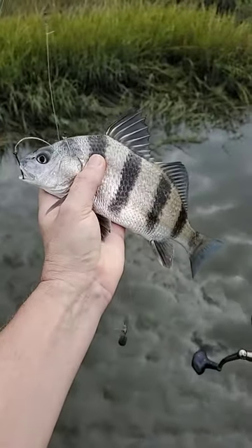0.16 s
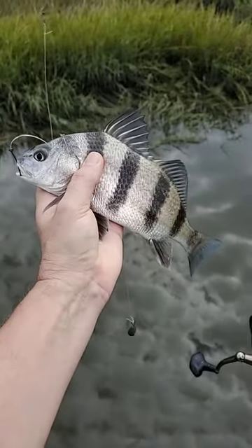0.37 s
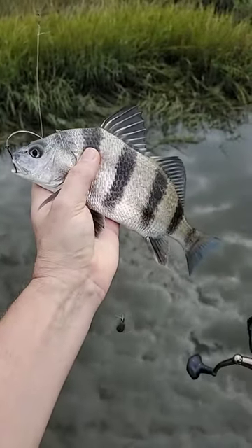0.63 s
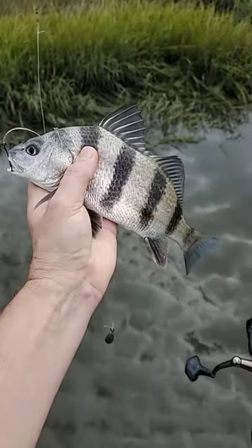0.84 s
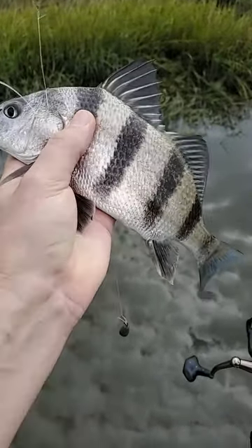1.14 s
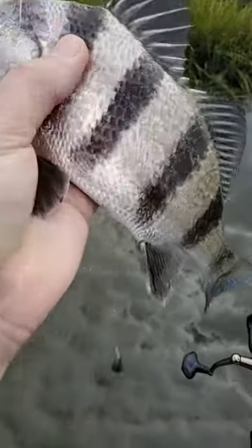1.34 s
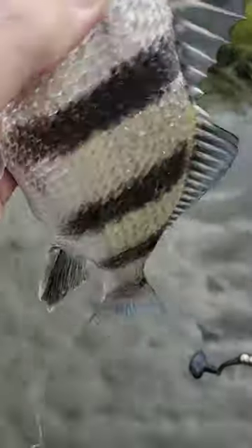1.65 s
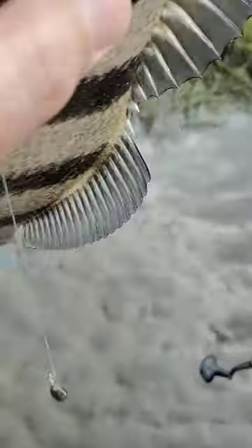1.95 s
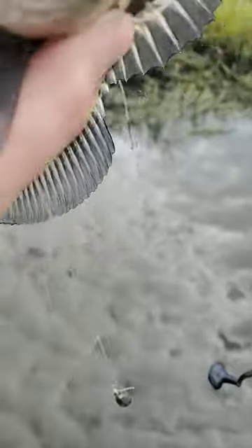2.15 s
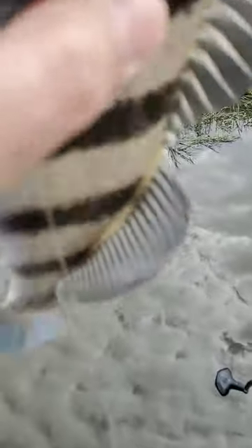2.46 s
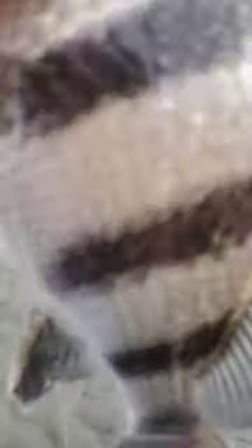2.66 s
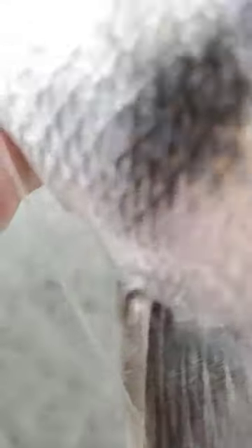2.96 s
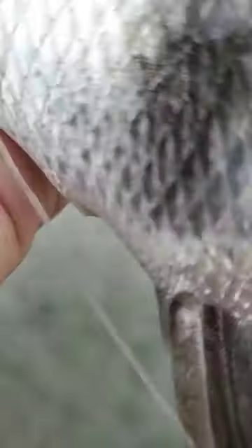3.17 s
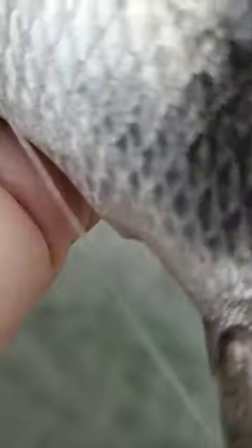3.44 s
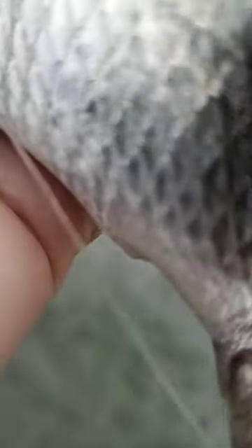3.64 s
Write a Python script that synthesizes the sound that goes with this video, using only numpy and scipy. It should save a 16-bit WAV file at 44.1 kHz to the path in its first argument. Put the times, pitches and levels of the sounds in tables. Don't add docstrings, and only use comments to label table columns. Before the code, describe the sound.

Four rapid, dull knocks from a small fish near the end, amid quiet outdoor rumble.

```python
import sys
import numpy as np
from scipy import signal
from scipy.fft import rfft, irfft
from scipy.io import wavfile

SR = 44100
rng = np.random.default_rng(int(sys.argv[2]) if len(sys.argv) > 2 else 0)


def voltage_ratio(decibels):
    exponent = np.asarray(decibels, float) / 20
    return 10 ** exponent


def bounce(signal):
    frames = np.transpose(np.atleast_2d(signal))
    limited = np.clip(frames, -1, 1)
    pcm = np.round(limited * 32767).astype(np.int16)
    wavfile.write(sys.argv[1], SR, pcm)


N = 167580

# frequency in Hz, density in dB per Hz.
RUMBLE_SPECTRUM = [(24, -31), (42, 0), (92, -3.5), (125, -11), (270, -17), (310, -17.5), (420, -23.5),
                   (1300, -33.5)]
HISS_SPECTRUM = [(1300, 2.5), (1900, -8.5), (2800, -18), (6400, -21.5), (6900, -28.5), (9000, -31.5),
                 (12000, -26.5), (15600, -22.5)]
# time in seconds, level in dB.
RUMBLE_SWELL = [(0, -3), (.4, -1), (.75, -1.5), (.95, -1.0), (1.35, -0.5), (1.7, -2.5), (2.05, 1),
                (2.38, -2), (2.55, -2.5), (2.75, 0.5), (3.8, 1.5)]
HISS_SWELL = [(0, 0.5), (1.9, 1), (2.5, -0.5), (2.95, 0.5), (3.15, 3.5), (3.45, 1), (3.8, 1.0)]
# frequency in Hz, correlation (clipped to 0..1).
PORT_LIKENESS = [(60, 2.3), (200, 1.8), (380, 0.68), (700, 0.34), (1300, 0.03), (15000, 0.0)]
# frequency in Hz, left minus right in dB.
PORT_LEAN = [(100, 1.0), (400, -0.5), (750, 4.0), (1400, -0.5), (2100, -6.5), (3100, 8), (6000, 5.5),
             (8000, 0)]
# frequency in Hz, width in Hz, level in dB.
MOTOR_HUMS = [(91.5, 10, -52), (317, 14, -64)]
# time in seconds, level in dB.
GUST_LEVEL = [(0, -64), (1.9, -56), (2.2, -60.5), (2.9, -57), (3.05, -45.5), (3.4, -50), (3.8, -53)]
# centre in seconds, peak in dB, pitch in Hz, length in seconds.
LEFT_BUFFETS = [(3.039, -18, 58, 0.01), (3.091, -20, 62, 0.012), (3.153, -20, 72.5, .012),
                (3.185, -20.5, 70, 0.0081), (3.2, -23.5, 65, 0.015), (3.242, -38, 70, .012),
                (3.266, -23.5, 81, .012), (3.3, -21.5, 58, .012), (3.332, -44, 70, .012),
                (3.368, -21, 62, 0.0084), (3.415, -33, 59.6, .012), (3.521, -29, 80, 0.02),
                (3.569, -25.5, 68, 0.019), (3.612, -32, 69.5, 0.019), (3.649, -28, 63, 0.011)]
RIGHT_BUFFETS = [(3.206, -29, 60, .012), (3.25, -18, 63, 0.01), (3.381, -32.5, 71.5, .013),
                 (3.446, -28.5, 74.5, .014), (3.484, -27.5, 63, 0.029), (3.745, -22.5, 65, 0.015),
                 (3.803, -16.5, 70, 0.0071)]
# start in seconds, length in seconds, level in dB, pitch in Hz.
CRICKET_TRILLS = [
    (0.0, .11, -82, 3120),
    (1.4, .4, -86, 3200),
    (3.27, .145, -76, 3100),
    (3.14, .16, -82, 3700),
    (1.62, .09, -84, 5500),
    (3.2, .22, -89, 4600),
    (2.76, .16, -87, 4600),
]
# first second, last second, strokes per second, lower wing tone in dB on the right.
KATYDID_PHRASES = [
    (.415, .86, 26.9, -2.0),
    (.963, 1.23, 27.4, 0.0),
    (1.341, 1.9, 27.4, 6),
]
# time in seconds, level in dB, left minus right in dB.
KATYDID_EFFORT = [(.41, -75.5, 9), (.56, -66, 6), (.7, -58.5, 3), (.79, -60.5, 4), (.86, -68, 4),
                  (.97, -73, 8), (1.18, -69, 3), (1.24, -70.5, 2), (1.34, -74, 7), (1.5, -69, 7),
                  (1.66, -75, -2), (1.75, -72.5, 5), (1.9, -74, 9)]
# frequency in Hz, width in Hz, level in dB.
LEFT_WING = [(15000, 1500, 0.0), (13900, 1700, -7)]
RIGHT_WING = [(14800, 1500, 0.0), (12900, 1300, -4)]
# time in seconds, peak in dB, pitch in Hz.
FIN_TICKS = [(1.401, -66, 3200), (1.566, -72, 3200), (1.733, -65, 3300), (2.133, -60, 5100),
             (2.271, -63, 3870), (2.301, -66, 3960), (2.331, -65, 4170), (2.652, -67, 6000),
             (2.765, -63, 3280), (2.795, -62.5, 4170), (2.829, -62, 3900), (2.864, -61, 3500),
             (2.894, -61.5, 3400), (2.954, -67, 3500), (3.046, -67, 6500), (3.065, -65, 3300),
             (3.104, -62, 3400), (3.76, -64, 7200)]
# time in seconds, peak in dB, snap in dB.
DRUM_BEATS = [
    (3.0796, -6, -25),
    (3.1105, -7, -31),
    (3.1413, -6.5, -29.5),
    (3.1802, -5, -28),
]
# direct level in dB, bladder ring in dB, ring lag in seconds, snap in dB.
LEFT_PATH = (0.0, -21, .000645, 0.0)
RIGHT_PATH = (-24.6, -14, .000264, -7)


def in_time(rows):
    s, *columns = np.transpose(rows)
    return [np.interp(np.arange(N) / SR, s, c) for c in columns]


def at_hz(points, hz):
    table_hz, values = np.transpose(points)
    return np.interp(np.log(hz), np.log(table_hz), values)


def rms_one(x):
    return x / np.sqrt(np.mean(x ** 2) + 1e-20)


def drift(rate):
    hold = 40
    r = np.exp(-2 * np.pi * rate * hold / SR)
    slow = signal.lfilter([1], [1, -2 * r, r * r], rng.standard_normal(N // hold + 2002))
    slow = rms_one(slow[2000:])
    return np.interp(np.arange(N) / hold, np.arange(len(slow)), slow)


def resonate(x, hz, width_hz):
    r = np.exp(-np.pi * width_hz / SR)
    poles = [1, -2 * r * np.cos(2 * np.pi * hz / SR), r * r]
    return signal.lfilter(np.array([1, 0, -1]) * (1 - r * r) / 2, poles, x + 1e-18)


def resonate_twice(x, hz, width_hz, second_width_hz):
    return resonate(resonate(x, hz, width_hz), hz, second_width_hz)


def diffuse_noise(spectrum, patchy_db, shared):
    hz = np.maximum(np.arange(N // 2 + 1) * SR / N, 1)
    ports = np.array([[1], [-1]])
    alike = np.clip(at_hz(PORT_LIKENESS, hz), 0, 1)
    lean_db = at_hz(PORT_LEAN, hz) / 2 * ports
    mid, side = rfft(rng.standard_normal((2, N)))
    low, high = spectrum[0][0], spectrum[-1][0]
    both = np.sqrt(1 + alike) * mid + np.sqrt(1 - alike) * side * ports
    both = both * voltage_ratio(at_hz(spectrum, hz) + lean_db)
    both = both * (hz >= low) * (hz < high)
    out, together = 0, drift(4.5)
    for step in np.arange(np.floor(2 * np.log2(low)), 2 * np.log2(high) + 1):
        share = np.clip(1 - np.abs(2 * np.log2(hz) - step), 0, 1)
        flicker_db = patchy_db * (shared * together + drift(11.7))
        out = out + irfft(both * share, N) * voltage_ratio(flicker_db)
    return rms_one(out)


def rumble():
    swell_db, = in_time(RUMBLE_SWELL)
    return voltage_ratio(-40.5 + swell_db) * diffuse_noise(RUMBLE_SPECTRUM, patchy_db=1.0, shared=0.23)


def hiss():
    swell_db, = in_time(HISS_SWELL)
    return voltage_ratio(-67.5 + swell_db) * diffuse_noise(HISS_SPECTRUM, patchy_db=0.97, shared=0.31)


def drone():
    out = 0
    for hz, width, db in MOTOR_HUMS:
        out = out + voltage_ratio(db) * rms_one(resonate_twice(rng.standard_normal(N), hz, width, width))
    return out


def wind():
    t, (gust_db,) = np.arange(N) / SR, in_time(GUST_LEVEL)
    gust_hz, gust_width_hz, lumps_db = 58, 62, 2.5
    out = np.zeros((2, N))
    for side, buffets in enumerate([LEFT_BUFFETS, RIGHT_BUFFETS]):
        turbulence = resonate_twice(rng.standard_normal(N), gust_hz, gust_width_hz, 2 * gust_width_hz)
        out[side] = voltage_ratio(gust_db + lumps_db * drift(14.2)) * rms_one(turbulence)
        for s, db, hz, length in buffets:
            lump = np.exp(-((t - s) / length) ** 2)
            out[side] += voltage_ratio(db) * np.cos(2 * np.pi * hz * (t - s)) * lump
    return out


def cricket():
    t, out = np.arange(N) / SR, 0
    width_hz, throb_hz, edge_s = 64, 20.5, .015
    for s, length, db, hz in CRICKET_TRILLS:
        gate = np.clip(np.minimum(t - s, s + length - t) / edge_s, 0, 1)
        throb = .75 - 0.31 * np.cos(2 * np.pi * throb_hz * (t - s))
        whistle = rms_one(resonate_twice(rng.standard_normal(N), hz, width_hz, width_hz))
        out = out + voltage_ratio(db) * gate * throb * whistle
    return out * voltage_ratio([[0], [-7.0]])


def katydid():
    t, strokes, lower_db = np.arange(N) / SR, np.zeros(N), np.zeros(N)
    stroke_s, teeth_per_s = 0.0057, 2000
    after_db, after_s = -12, 0.038
    for first, last, rate, db in KATYDID_PHRASES:
        lower_db[t > first - .03] = db
        for s in np.arange(first, last, 1 / rate):
            effort = voltage_ratio(rng.normal(0, 1.5))
            strokes += effort * np.exp(-((t - s - rng.normal(0, 0.00077)) / stroke_s) ** 2)
    fade = np.exp(-1 / (after_s * SR))
    after = voltage_ratio(after_db) * after_s / stroke_s * signal.lfilter([1 - fade], [1, -fade], strokes)
    effort_db, lean_db = in_time(KATYDID_EFFORT)
    teeth = rms_one((rng.random(N) < teeth_per_s / SR) * rng.standard_normal(N))
    out = np.zeros((2, N))
    for side, wing in enumerate([LEFT_WING, RIGHT_WING]):
        scrape = teeth + .7 * rng.standard_normal(N)
        drive = strokes * scrape + after * rng.standard_normal(N)
        tones = []
        for hz, width, db in wing:
            tone = resonate_twice(resonate(drive, hz, width), hz, 2 * width, 2 * width)
            tones.append(voltage_ratio(db) * tone)
        upper, lower = tones
        song = upper + lower * voltage_ratio(side * lower_db)
        out[side] = 3.5 * song * voltage_ratio(effort_db - side * lean_db)
    return out


def ticks():
    size, cycles = 900, 12
    out, t = np.zeros(N + size), np.arange(size) / SR
    for s, db, hz in FIN_TICKS:
        grit = rng.standard_normal(size) * np.exp(-t * hz / cycles)
        burst = resonate_twice(grit, hz, .7 * hz, .9 * hz)
        start = int(s * SR) - 40
        out[start:start + size] += 1.4 * voltage_ratio(db) * burst / np.abs(burst).max()
    return out[:N] * voltage_ratio([[0], [-12]])


def fish():
    t, out = np.arange(N) / SR, np.zeros((2, N))
    twitch_s, snap_hz, snap_s, right_snap_late_s = .00053, 1230, .00062, .00038
    bladder_hz, bladder_t60_s = 446, .0074
    r, w = voltage_ratio(-60 / (bladder_t60_s * SR)), 2 * np.pi * bladder_hz / SR
    for side, (direct_db, ring_db, lag, near_db) in enumerate([LEFT_PATH, RIGHT_PATH]):
        push, late, snap = np.zeros((3, N))
        for s, db, snap_db in DRUM_BEATS:
            u = (t - s) / twitch_s
            v = (t - s - lag) / twitch_s
            since = t - s - side * right_snap_late_s
            push += voltage_ratio(db) * (1 - u * u) * np.exp(-u * u / 2)
            late += voltage_ratio(db) * (1 - v * v) * np.exp(-v * v / 2)
            snap += voltage_ratio(snap_db) * np.cos(2 * np.pi * snap_hz * since) * np.exp(-(since / snap_s) ** 2)
        ring = signal.lfilter([0, np.sin(w) * w], [1, -2 * r * np.cos(w), r * r], late + 1e-18)
        out[side] = voltage_ratio(direct_db) * push + voltage_ratio(near_db) * snap + voltage_ratio(ring_db) * ring
    return out


def scene():
    return rumble() + hiss() + drone() + wind() + cricket() + katydid() + ticks() + fish()


def top_cut(x):
    return signal.sosfilt(signal.butter(12, 16480, fs=SR, output="sos"), x)


def record(dry):
    low_pass = signal.ellip(12, .1, 80, 15600, fs=SR, output="sos")
    mix = signal.sosfilt(low_pass, dry)
    return top_cut(mix)


dry = scene()
out = record(dry)
bounce(out)
```